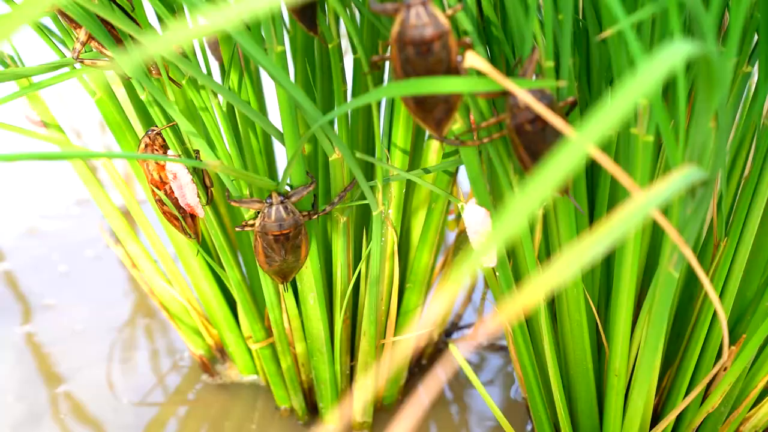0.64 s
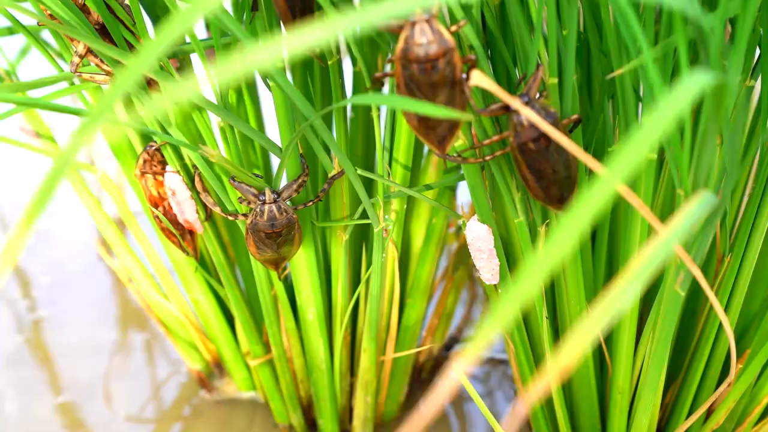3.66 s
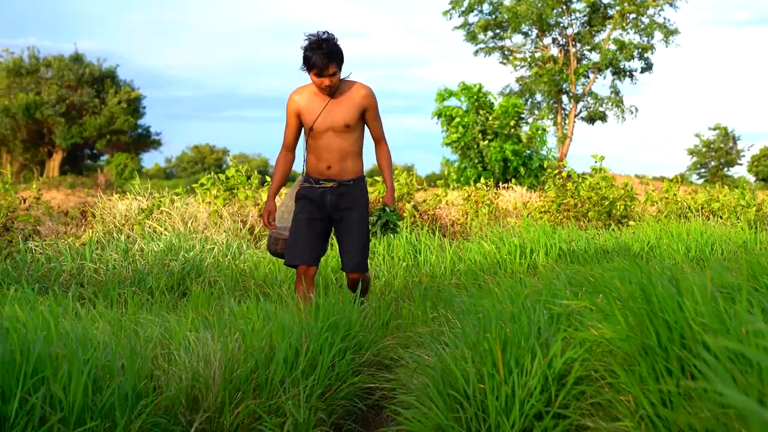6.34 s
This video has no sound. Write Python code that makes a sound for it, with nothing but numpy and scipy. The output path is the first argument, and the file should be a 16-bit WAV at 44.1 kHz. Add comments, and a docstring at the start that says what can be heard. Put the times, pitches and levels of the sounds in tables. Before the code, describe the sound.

A flooded rice field is heard from among the stalks, louder on the left. Throughout, an insect keeps up a high, fast trill over a faint distant chorus, while wind rumbles on the microphone, bumping most from 1.5 to 3.7 seconds and again around 5. In the first second small birds give quick rising squeaks and short rasps, the sharpest at 0.5 seconds. Leaves rustle softly and fade, and a few tiny bubbles sound around 1 second. A second insect buzzes briefly at about 1, 2.2 and 4.3 seconds. Frogs give quiet, short nasal whines, clustered between 1.3 and 2.2 seconds and again from 4 to 5.5. A clear squeak comes at 2.6 seconds, then the birds chatter in dense rasps and squeaks from 3.2 to 4.9. A few more squeaks and a last frog call come before the end, just past 6 seconds.

```python
"""A flooded rice field in a light breeze, heard from among the stalks.
Small birds squeak in quick upward slides and rasp with snaps that ring their throats. Frogs whine
in nasal stacks of harmonics. One insect scrapes out an unbroken trill, another buzzes in bursts.
Underneath sit a few rising bubbles, rustling leaves and a far chorus, while eddies of wind
rumble on a microphone that favours the left."""
import sys
import numpy as np
from scipy import signal
from scipy.fft import rfft, irfft
from scipy.io import wavfile
from scipy.ndimage import uniform_filter1d, map_coordinates

SR = 44100
rng = np.random.default_rng(int(sys.argv[2]) if len(sys.argv) > 2 else 0)


def materialize(psi):
    """Save the field psi as 16-bit PCM at rate SR to the path in sys.argv[1].

    A 1-D psi becomes a single channel; in a 2-D psi each row is a channel.
    """
    bounded = np.clip(np.atleast_2d(psi).T, -1, 1)
    quanta = np.round(bounded * 32767).astype(np.int16)
    wavfile.write(sys.argv[1], SR, quanta)


N = 281358
TIME = np.arange(N) / SR

# Bird squeaks, and at 5.338 s a brief bright crack within the higher frog's whine, played the same way. Each
# row: start in seconds, length in seconds, level in dB, final pitch in Hz, roughness from 0 to 1, tilt in dB
# per harmonic.
SQUEAKS = [(0.507, 0.0281, -25.5, 1538, 0.14, -5.5), (0.859, 0.015, -40, 1450, 0.2, -4),
           (0.897, 0.0078, -36, 1400, 0.17, -2), (0.937, 0.012, -36, 1440, 0.2, -4),
           (.955, .013, -30.5, 1463, 0.1, -5), (2.568, 0.025, -28, 1495, 0.08, -7),
           (2.978, 0.014, -37, 1730, 0.6, -11), (3.214, .011, -47, 1690, 0.05, -9),
           (3.398, 0.0278, -33, 1622, 0.25, -6), (3.777, .015, -42.5, 1760, 0.3, -23),
           (4.213, 0.019, -36, 1530, .06, -8), (4.707, 0.015, -41, 1550, 0.15, -9),
           (5.338, .026, -38.5, 1900, 0.23, -1.5), (5.794, 0.0218, -36, 1640, .1, -2.5),
           (5.94, 0.013, -45, 1790, 0, -20)]
# Bird rasps. Each row: start in seconds, length in seconds, relative level in dB, tilt in dB per octave.
RASPS = [(0.149, 0.017, -39.5, -25), (0.325, 0.043, -46.5, -32), (0.502, 0.0062, -27.5, 5),
         (0.535, 0.033, -40, 0), (0.682, 0.021, -41, -14), (.844, .005, -33.5, -9), (0.868, .015, -37, 3),
         (.918, 0.06, -36, 6), (3.163, 0.015, -37.5, -12), (3.242, 0.027, -44, 4),
         (3.386, 0.048, -33.5, 11), (3.586, .016, -40, -20), (3.619, 0.0098, -31, -5),
         (3.662, 0.028, -36, -10.5), (3.705, .013, -40, -4), (3.747, 0.014, -34, -13),
         (3.89, 0.032, -37.5, -16), (3.944, 0.057, -42.5, -10), (3.975, 0.018, -36.5, -4),
         (4.007, 0.034, -40, -13), (4.06, .053, -39.5, -1), (4.135, .026, -36, -10), (4.211, .027, -32, -5),
         (4.249, 0.031, -36, 3), (4.289, 0.0091, -35, -7), (4.346, 0.0055, -32.5, -7),
         (4.378, 0.021, -31.5, -4), (4.462, 0.013, -36.5, -4), (4.483, 0.018, -32, -9),
         (4.58, 0.023, -38, 12), (4.622, 0.026, -37, -10), (4.704, 0.025, -30.5, -4),
         (4.757, 0.014, -36.5, -5), (4.837, .019, -36, 5)]
# The deeper frog's calls. Each row: start in seconds, length in seconds, level in dB, brightness in dB.
DEEP_WHINES = [(1.33, 0.25, -45, -6), (1.91, .24, -48, 2), (4.54, 0.24, -46, -17), (5.022, .24, -49.5, 8.5),
               (6.266, 0.29, -46.5, 2)]
# The higher frog's calls. Each row: the same four, then middle pitch in Hz, rise in Hz.
HIGH_WHINES = [(-.1, .34, -57, 12.5, 621.6, 50.5), (0.482, .25, -51.5, 2, 612, -6.5),
               (1.3, 0.32, -47.5, -4, 639, 10), (1.452, 0.301, -43.5, -5, 633.4, 13.5),
               (2.82, .18, -50, 0, 610, 43), (4.117, 0.53, -55.5, 5.5, 626, 36),
               (5.17, 0.3, -45, -1, 634.3, 30.5)]
# The frogs' timbres. Each row: harmonic number, gain in dB.
DEEP_VOICE = [(2, -13.5), (3, 6.5), (4, -1.5), (5, -5), (6, 8), (7, -2), (8, -10.5), (9, -22)]
HIGH_VOICE = [(2, -15.5), (3, 3.5), (4, -14), (5, 0.5), (6, 8), (7, -2), (8, -5), (9, -15), (10, -18),
              (11, -29)]
# The trill's tempo. Each row: time in seconds, syllables per second.
TRILL_PACE = [(0.0, 21.29), (0.33, 24.0), (0.58, 21.56), (1.39, 22.61), (1.6, 25.71), (2.17, 23.07),
              (2.52, 23.7), (3.42, 22.54), (3.52, 25.01), (3.73, 21.96), (4.31, 22.09), (4.92, 24.38),
              (5.08, 21.06), (5.42, 23.51), (5.78, 24.65), (6.38, 23.12)]
# Insect buzzes. Each row: start in seconds, length in seconds, relative level in dB,
# swell in dB per second.
BUZZES = [(.95, .34, -34.5, -21), (2.18, 0.36, -37.5, -17), (4.252, 0.265, -44, 34)]
# Throat and body resonances. Each row: centre in Hz, width in Hz, gain in dB.
RASP_THROAT = [(1643, 340, 7.5), (1914, 600, 12.5), (2623, 700, 21), (3200, 540, 14.5)]
TRILL_BODY = [(3297, 370, 6.5), (3737, 393, 12.5), (4206, 130, 0)]
BUZZ_BODY = [(3400, 380, 3.3), (3763, 100, 11.6), (3930, 210, 4.6)]
# Bubbles. Each row: start in seconds, pitch in Hz, nominal length in seconds, level in dB.
BUBBLES = [(.795, 590, .038, -51.5), (0.83, 710, 0.016, -56), (1.062, 1165, .022, -51.5),
           (1.209, 786, .035, -54), (1.221, 996, .016, -51), (1.274, 1070, 0.021, -44),
           (3.752, 910, 0.015, -49)]
# Leaf flicks. Each row: start in seconds, level in dB.
LEAF_TICKS = [(0.437, -45), (0.461, -45.5), (1.674, -52), (1.724, -50), (1.767, -49), (4.562, -53.5)]
# Wind bumps on the microphone. Each row: peak time in seconds, relative level in dB.
BUFFETS = [(1.599, -26), (1.758, -23.5), (1.999, -25.5), (2.144, -31.5), (2.289, -36), (2.479, -30.5),
           (2.847, -32.5), (3.359, -34.5), (3.549, -29.5), (3.649, -26.5), (4.829, -31.5), (5.149, -29.5)]
# Fader rides. Each row: time in seconds, relative level in dB.
TRILL_LEVEL = [(0, -37), (.3, -43), (.75, -51), (.9, -40), (1.25, -50), (1.5, -41), (1.8, -48.5),
               (2.05, -41.5), (2.75, -50), (3.15, -42), (3.8, -48), (4.3, -44), (4.8, -53), (4.95, -43.5),
               (6.2, -43), (6.38, -39.5)]
CHATTER_LEVEL = [(0, -47), (1.1, -58), (3.1, -53), (3.3, -36.5), (3.55, -41), (4.5, -38.5), (4.9, -57),
                 (5.15, -52), (5.7, -60)]
RUSTLE_LEVEL = [(0, -49), (.62, -50.5), (.72, -46), (1.2, -47), (2.1, -54.5), (4.2, -55), (6.38, -61)]
BREEZE_LEVEL = [(0, -17.5), (.5, -24.5), (1.1, -22), (1.6, -17.5), (2.8, -18), (3.6, -19), (4.15, -29.5),
                (4.58, -27), (4.9, -18.5), (5.2, -24), (5.48, -17), (6.15, -37), (6.38, -25.5)]
# EQ curves of the noise beds. Each row: frequency in Hz, relative spectral density in dB.
CHORUS_EQ = [(1000, -67), (2000, -11.5), (2600, -5), (3200, 1), (3800, 8), (4500, -4.5), (5200, -9),
             (6500, -69), (9000, -57)]
LEAF_EQ = [(500, 9), (2000, 2), (5500, 3), (8000, -3), (12000, -8.5), (16000, -9)]
EDDY_EQ = [(5, 2), (14, 3.5), (22, 1.5), (32, -2), (50, -11), (70, -18.5), (100, -31), (160, -37.5),
           (400, -76.5)]
FLUTTER_EQ = [(30, -3.5), (70, 1.5), (100, -1.5), (160, -11), (300, -23.5), (800, -45), (3000, -80)]
BUFFET_EQ = [(30, -10), (70, 5.5), (110, -2), (180, -8.5), (280, -19), (450, -30), (800, -36), (3000, -78)]
AIR_EQ = [(30, -2), (120, 0), (300, 2.5), (500, -6), (900, -12.5), (2000, -14), (6000, -19), (16000, -27.5)]
HISS_EQ = [(30, 22), (150, -3), (400, -2), (1000, 3.5), (4000, -5), (9000, 0), (16000, -1)]

DEEP_HZ, DEEP_RISE_HZ = 579, 15.8
DEEP_ARCH_HZ, HIGH_ARCH_HZ = -33.5, 3.98  # the deeper call sags in the middle, the higher one arches


def squeak(start, length, level_db, target_hz, rough, tilt_db):
    """A bird's note snaps on, slides quickly up to pitch and is cut off; a rough one rattles."""
    t = np.arange(0, length + .0026, 1 / SR)
    scoop = 6.7 * length * np.exp(-t / (.171 * length))  # longer notes start further below pitch
    hz = target_hz * (1 - scoop)
    cycles = np.cumsum(hz * (1 + .25 * rough * waver(t, 883))) / SR
    tone = sum(gain_of(tilt_db * (k - 1) - 3 * max(k - 2, 0)) * np.sin(2 * np.pi * k * cycles)
               for k in range(1, 5))
    rattle = 1 + rough * (np.cos(2 * np.pi * cycles / 3) + 1.1 * waver(t, 1540))
    gate = np.minimum(t / .0015, 1) * np.minimum((t[-1] - t) / .004, 1)
    decay = np.exp(-1.15 * t / length)
    return start, gain_of(level_db) * unit_rms(tone * rattle * gate * decay)


def rasp(start, length, level_db, tilt_db, snaps_per_s=370):
    """A short run of nearly even snaps rings a bird's throat, dulling as it fades."""
    jitter, accent, variation = rng.standard_normal((3, 64))
    rate = snaps_per_s * np.exp(.15 * variation[-1])
    count = max(round(length * rate), 1)
    times = np.maximum(np.arange(count) + .09 * jitter[:count], 0) / rate
    throat = 0
    for k, (hz, width, db) in enumerate(RASP_THROAT):
        octaves = np.log2(hz / 2000)
        decay = np.exp(-(.66 + .75 * octaves) * times / length)  # highs die first
        snaps = clicks(times, unit_rms(decay * gain_of(1.5 * accent[:count])), count=4096)
        throat += ring(snaps, [(hz * (1 + .05 * variation[k]), width, db + tilt_db * octaves)])
    softened = unit_rms(signal.sosfilt(signal.butter(3, 4000, fs=SR, output="sos"), throat))
    return start, gain_of(level_db + 1) * softened * np.sqrt(length * SR / len(softened))


def whine(voice, arch_hz, start, length, level_db, bright_db, middle_hz, rise_hz):
    """A frog's nasal, slightly rough stack of harmonics swells, bends in pitch and stops."""
    t = np.arange(0, length, 1 / SR)
    progress = t / length
    hz = middle_hz + rise_hz * (progress - .5) - arch_hz * (2 * progress - 1) ** 2
    cycles = np.cumsum(hz * (1 + .0037 * waver(t, 166.7))) / SR
    swell = np.interp(progress, [0, .25, .5, .8, 1], [0, .4, 1, .85, 0])
    tone = 0
    for k, db in voice:
        lift_db = bright_db * np.interp(k, [3, 6, 7], [0, 1, .3])  # strongest at the sixth harmonic
        gain = gain_of(level_db + db + lift_db + .54 * waver(t, 37))
        envelope = swell ** max(k / 3, 1)  # upper harmonics come in only near full effort
        grit = 1 + gain_of(-11.5) * waver(t, 301)
        tone += gain * envelope * grit * np.sin(2 * np.pi * (k * cycles + rng.random()))
    return max(start, 0), np.sqrt(2) * tone[t + start >= 0]


def trill(scrape_gap_s=.0023, climb_s=.0062, taper_s=.012):
    """Each of an insect's syllables is a run of scrapes that climbs through its body's resonances."""
    syllables = np.cumsum(curve(TRILL_PACE)) / SR
    onsets = .007 + np.interp(np.arange(int(syllables[-1]) + 1), syllables, TIME)
    jitter, accent = rng.standard_normal((len(onsets), 12, 2)).transpose(2, 0, 1)
    offsets = (np.arange(12) + .29 * jitter) * scrape_gap_s
    times = (onsets[:, None] + offsets).ravel()
    body = 0
    for k, resonance in enumerate(TRILL_BODY):
        sizes = np.exp(-((offsets - k * climb_s) / taper_s) ** 2) * gain_of(1.2 * accent)
        body += ring(clicks(times, sizes.ravel()), [resonance])
    return gain_of(curve(TRILL_LEVEL)) * unit_rms(body)


def buzz(start, length, level_db, db_per_s, scrapes_per_s=150):
    """A second insect's scrapes ring its body in a short burst that fades or swells."""
    t = np.arange(0, length, 1 / SR)
    strokes = np.floor(np.cumsum(scrapes_per_s * (1 + .32 * waver(t, 120))) / SR)
    scrapes = np.diff(strokes, prepend=0) * gain_of(1.5 * waver(t, 142))
    envelope = gain_of(level_db + db_per_s * t - 1.5) * signal.windows.tukey(len(t), .3)
    return start, envelope * unit_rms(ring(scrapes, BUZZ_BODY))


def bubble(start, hz, length, level_db, rise=.123):
    """A bubble rings as a damped sine, bending upward."""
    progress = np.arange(0, 1.5, 1 / (SR * length))
    tone = np.sin(2 * np.pi * np.cumsum(hz * (1 + rise * progress)) / SR)
    envelope = np.minimum(progress / .33, 1) * np.exp(-2.2 * progress)
    return start, gain_of(level_db) * unit_rms(tone * envelope)


def leaf_tick(start, level_db, decay_s=.0029):
    """A dry leaf flicks against another."""
    t = np.arange(0, .012, 1 / SR)
    return start, gain_of(level_db) * unit_rms(rng.standard_normal(len(t)) * np.exp(-t / decay_s))


def far_chatter(snaps_per_s=600):
    """Far birds rasp in short clumps with quiet gaps between."""
    snaps = rng.random(N) < snaps_per_s / SR
    clumps = gain_of(7 * np.minimum(waver(TIME, 55), 1.3))
    throats = ring(snaps * clumps, [(1895, 470, .49), (2740, 540, .52)])
    return gain_of(curve(CHATTER_LEVEL) - 5.5) * unit_rms(throats)


def far_chorus():
    """Distant calls blur into a high, shimmering band of noise."""
    return gain_of(-46 + 1.2 * waver(TIME, 60)) * noise(CHORUS_EQ)


def rustle():
    """Leaves rustle in one flickering swell that dies away."""
    return gain_of(curve(RUSTLE_LEVEL) + waver(TIME, 37)) * noise(LEAF_EQ)


def wind(buffet_s=.034):
    """Slow eddies rock the microphone; smaller ones flutter as the breeze grows, and hit in buffets."""
    breeze_db = curve(BREEZE_LEVEL)
    eddies = noise(EDDY_EQ)
    eddies /= np.sqrt(uniform_filter1d(eddies ** 2, size=4000))  # levelled, so the breeze shapes them
    rumble = gain_of(breeze_db) * eddies
    flutter_db = -41.5 + .75 * (breeze_db + 20.5)
    flutter = gain_of(flutter_db) * unit_rms(gain_of(2.8 * waver(TIME, 35))) * noise(FLUTTER_EQ)
    bumps = sum(gain_of(db - 3.5) * np.exp(-((TIME - peak) / buffet_s) ** 2) for peak, db in BUFFETS)
    return signal.windows.tukey(N, .004) * (rumble + flutter + bumps * noise(BUFFET_EQ))


def field_echo(calls):
    """Stalks scatter each call at once; the field's edge returns a faint, thin echo some 45 ms later."""
    t = np.arange(0, .4, 1 / SR)
    stalks, edge = rng.standard_normal((2, len(t))) * (rng.random((2, len(t))) < 2000 / SR)
    stalks = stalks * (t > .003) * np.exp(-t / .025)
    edge = ring(edge * (t > .043) * np.exp(-t / .027), [(2900, 990, 0)])
    tail = gain_of(-17) * stalks / np.linalg.norm(stalks) + gain_of(-22) * edge / np.linalg.norm(edge)
    return calls + signal.fftconvolve(calls, tail)[:N]


def gain_of(db):
    """Decibels to a gain factor."""
    return 10 ** (np.asarray(db) / 20)


def unit_rms(x):
    """Normalises to rms 1."""
    return x / np.sqrt(np.mean(x ** 2) + 1e-20)


def curve(rows):
    """Straight-line automation through (time, value) points."""
    return np.interp(TIME, *np.transpose(rows))


def waver(t, per_s):
    """Smooth random modulation of rms about 1 over the times t."""
    knots = rng.standard_normal(4096)
    return map_coordinates(knots, [(t - t[0]) * per_s], order=3, mode="wrap")


def noise(eq):
    """Noise of rms 1, coloured by an EQ curve."""
    hz, db = np.transpose(eq)
    bins_hz = np.fft.rfftfreq(N, 1 / SR)
    colour = gain_of(np.interp(np.log(bins_hz + 1), np.log(hz), db))
    return unit_rms(irfft(rfft(rng.standard_normal(N)) * colour, N))


def clicks(times, sizes, count=N):
    """Single impulses at the given times."""
    samples = np.clip(np.round(times * SR).astype(int), 0, count)
    return np.bincount(samples, sizes, count + 1)[:count]


def ring(x, body):
    """Passes x through each resonance twice, which keeps the skirts steep."""
    rung = 0
    for hz, width, db in body:
        b, a = signal.iirpeak(hz, hz / (1.55 * width), SR)
        rung += gain_of(db) * signal.lfilter(b, a, signal.lfilter(b, a, x))
    return rung


def track(cues):
    """Lays (start in seconds, sound) cues on one track."""
    mix = np.zeros(N)
    for start, sound in cues:
        slot = mix[round(start * SR):][:len(sound)]
        slot += sound[:len(slot)]
    return mix


def scene():
    """Calls, insects, water, leaves and wind share one mix, 10 dB louder on the left."""
    birds = track(squeak(*row) for row in SQUEAKS) + track(rasp(*row) for row in RASPS)
    # so small a throat radiates nothing low
    birds = signal.sosfilt(signal.butter(5, 1150, "highpass", fs=SR, output="sos"), birds)
    frogs = track(whine(DEEP_VOICE, DEEP_ARCH_HZ, *row, DEEP_HZ, DEEP_RISE_HZ) for row in DEEP_WHINES)
    frogs += track(whine(HIGH_VOICE, HIGH_ARCH_HZ, *row) for row in HIGH_WHINES)
    buzzes = track(buzz(*row) for row in BUZZES)
    water = track(bubble(*row) for row in BUBBLES)
    ticks = track(leaf_tick(*row) for row in LEAF_TICKS)
    bed = far_chorus() + rustle()
    animals = field_echo(birds + far_chatter() + frogs) + buzzes + trill()
    air = gain_of(-50) * noise(AIR_EQ)
    mix = animals + water + ticks + bed + air + wind()
    right = gain_of(-10)
    return mix * np.array([[1], [right]]) * 2 / (1 + right)


def record(dry, cutoff_hz=15800):
    """Each microphone channel adds its own hiss; a steep low-pass trims the top."""
    hiss = gain_of(-55) * np.array([noise(HISS_EQ), noise(HISS_EQ)])
    lowpass = signal.firwin(511, cutoff_hz, window=("kaiser", 9), fs=SR)
    return signal.oaconvolve(dry + hiss, lowpass[None], "same")


dry = scene()
out = record(dry)
materialize(out)
```